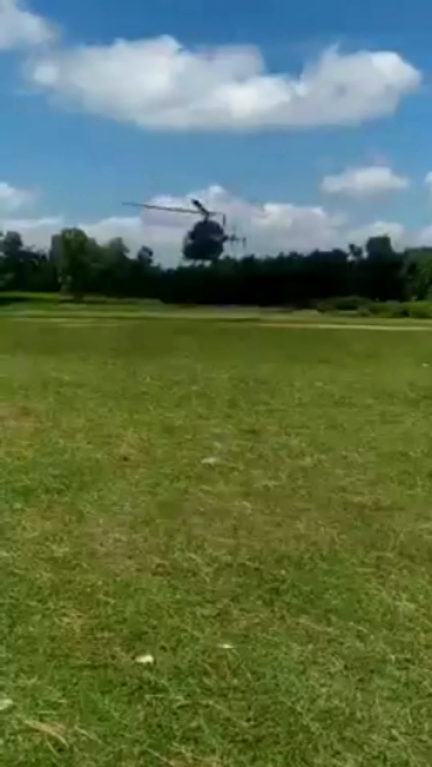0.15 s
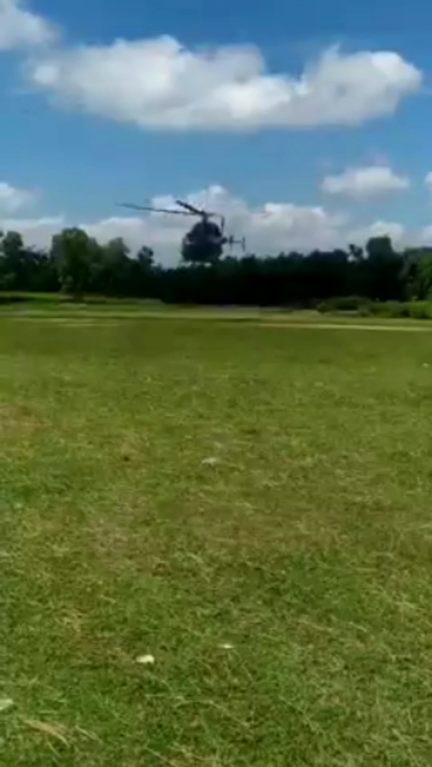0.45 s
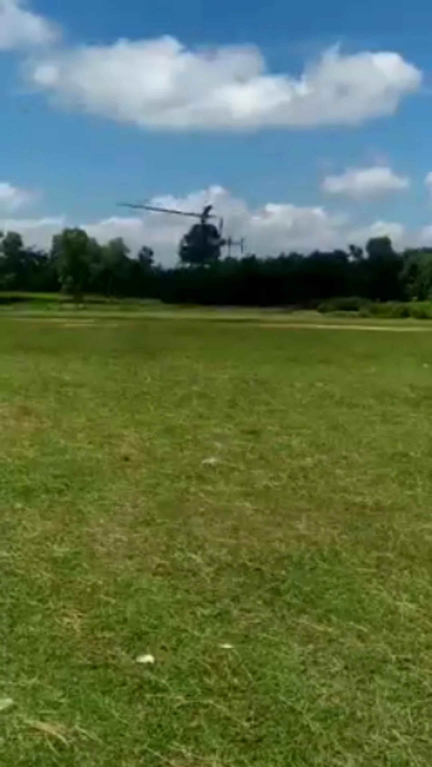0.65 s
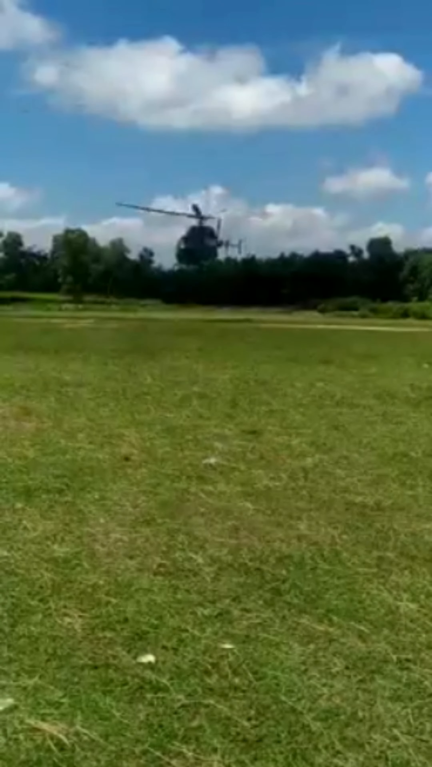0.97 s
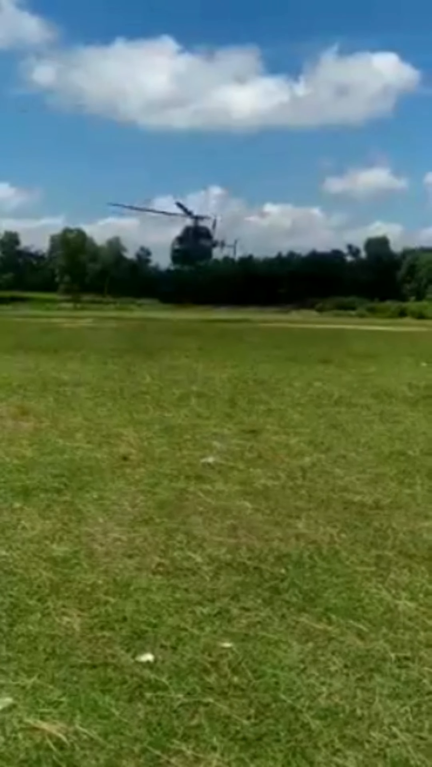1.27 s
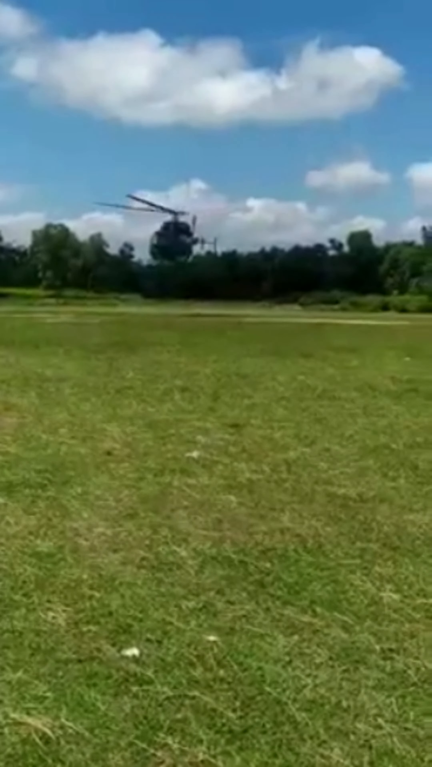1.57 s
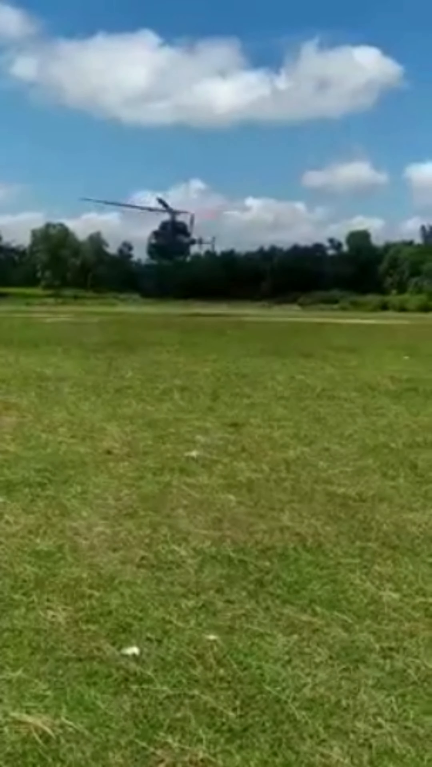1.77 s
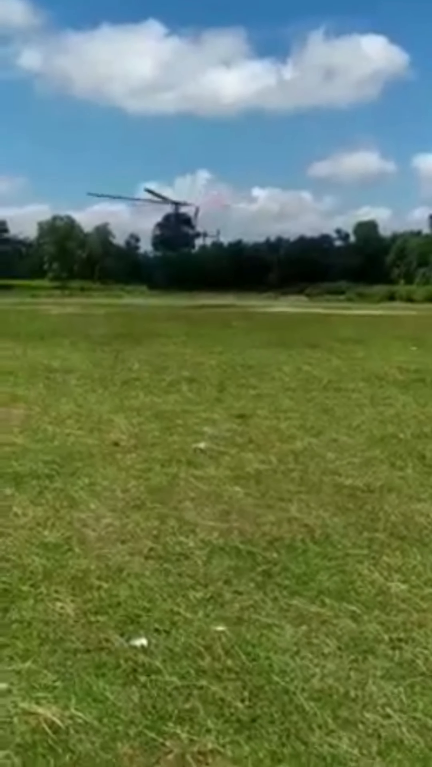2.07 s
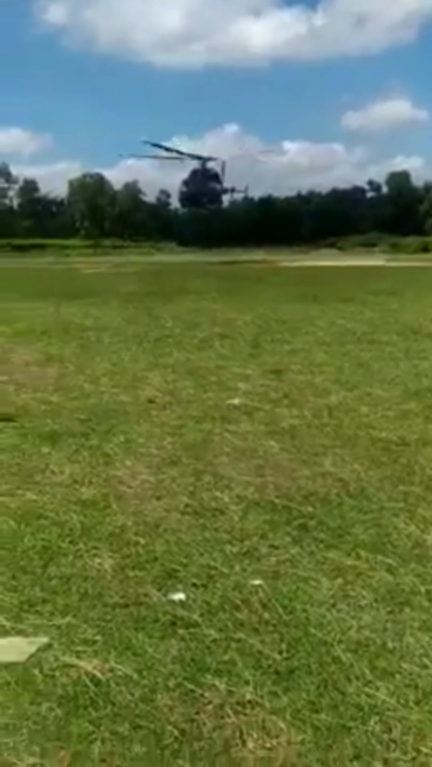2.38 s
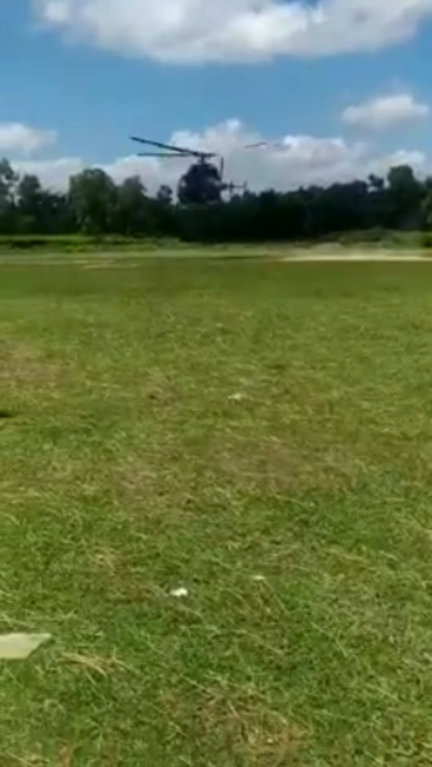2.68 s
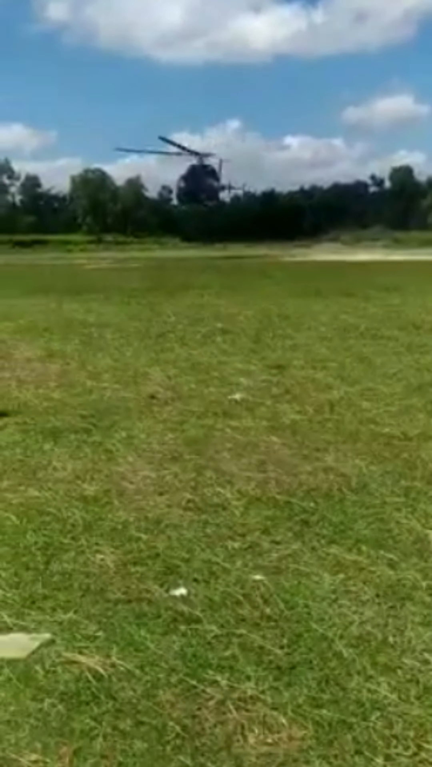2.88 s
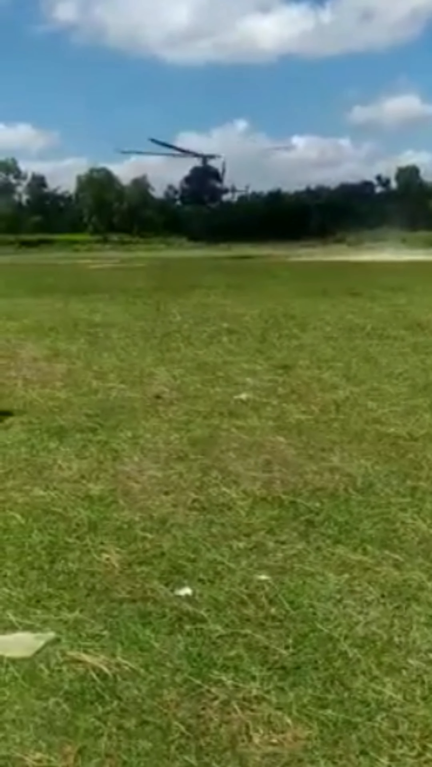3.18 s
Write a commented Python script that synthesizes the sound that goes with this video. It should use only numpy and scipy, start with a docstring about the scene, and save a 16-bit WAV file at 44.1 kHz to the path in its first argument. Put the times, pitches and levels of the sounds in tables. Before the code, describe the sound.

A helicopter hovers low nearby, its blades slapping fast over a steady rushing roar.

```python
"""A turbine helicopter hovers low over a grass field, some sixty metres from a phone.
It opens with a cluster of hard blade slaps (short noise bursts) over the steady roar of wash and exhaust
(banded noise, throbbing at each blade pass), two stacks of low rotor tones and thin high steady-pitched tones
that come and go. After the first second the slaps thin out, the tail rotor grows, the main thump loosens and
the roar loses its middle. Two microphone ports hear it slightly apart."""
import sys
import numpy as np
from scipy import signal
from scipy.fft import rfft, irfft
from scipy.io import wavfile
from scipy.ndimage import uniform_filter1d

SR = 44100
rng = np.random.default_rng(int(sys.argv[2]) if len(sys.argv) > 2 else 0)


def wrap_up_sound(samples):
    """Save the sound to the file named by the first command line argument, as 16-bit audio."""
    columns = np.atleast_2d(samples).T
    # keep every value between -1 and 1, then stretch to whole-number steps
    tamed = np.clip(columns, -1, 1)
    steps = np.round(tamed * 32767).astype(np.int16)
    wavfile.write(sys.argv[1], SR, steps)


N = 147294  # samples
TIME_S = np.arange(N) / SR
SIDE = np.array([[1], [-1]])  # left, right
BLADE_HZ, FIRST_BLADE_S = 26.66, 0.01054  # main blade passes per second, time of the first


def undb(db):
    """Decibels to an amplitude factor."""
    return 10 ** (np.asarray(db) / 20)


def curve(table, col):
    """A table column as a value for every sample."""
    rows = np.array(table)
    return np.interp(TIME_S, rows[:, 0], rows[:, col])


def shape(table, col, hz):
    """A table column read on a log-frequency axis."""
    rows = np.array(table)
    return np.interp(np.log(hz + 1), np.log(rows[:, 0]), rows[:, col])


def walk(rate_hz):
    """Random levels held 1 / rate s and slewed twice; spread near 1."""
    hold = int(SR / rate_hz)
    steps = np.repeat(rng.standard_normal(200)[:N // hold + 1], hold)
    slewed = uniform_filter1d(uniform_filter1d(steps, hold), hold)
    return 1.3 * slewed[:N]


def rms1(x):
    """Scale to an rms of 1."""
    return x / np.sqrt(np.mean(x ** 2))


def roar(hz, turns):
    """Wash and exhaust: noise bands that swell together, flicker alone and throb per blade; two unrelated copies."""
    # noise spectrum: pitch_hz, relative level_db
    roar_colour = [(40, -12), (100, 1), (200, 4), (320, 2), (450, -5), (750, 0), (1050, -5.5), (1600, -6),
                   (1850, -9), (2200, -5), (3100, -8), (3500, -11), (6000, -13), (10000, -17), (11800, -22),
                   (12500, -16), (14600, -15)]
    # slow balance: start_s, middle_db, treble_db, top_db
    balance = [(0, 0.8, -2, -1), (1.25, 0.5, -1.2, 2), (1.65, -0.8, -0.2, 2), (2.1, -2.5, 0.9, 3.5),
               (3, -4, -1.2, 2), (3.34, -6, 0.6, 1.5)]
    # corners of that balance: untouched below the first, then centres of middle, treble and top [Hz]
    balance_hz = (650, 1400, 6000, 13200)
    # throb at each blade and the puff after it, before depth per band: start_s, throb_db, puff_db, puff_lag_turns
    pulse = [(0.25, 5.5, 4.5, 0.3), (.55, 7.5, 2, .56), (1, 4.5, -2, 0.59), (1.3, 1, -3.5, .4),
             (1.7, 9, 6.5, 0.46), (2.1, 3, -1.5, 0.3), (2.5, 4.5, 0.5, .36), (2.68, 3.5, 7.5, 0.42),
             (2.9, 3.5, 3.5, 0.31)]
    roar_db, swell_db, flicker_db = -19.5, .2, 1.4
    swell_hz, flicker_hz = 1.94, 11
    pulse_scatter, pulse_sharpness = .2, 7  # spread of pulse size from blade to blade, narrowness

    def pulse_train(col, lag_turns):
        swing = np.cos(2 * np.pi * (turns - lag_turns)) - 1
        return curve(pulse, col) * np.exp(pulse_sharpness * swing)

    throb = pulse_train(1, 0)
    puff = pulse_train(2, curve(pulse, 3))
    blade = np.floor(turns + 1.5).astype(int)  # which blade is passing
    noise = rfft(rng.standard_normal((2, N))) * undb(shape(roar_colour, 1, hz))
    levels = np.array([curve(balance, c) for c in (1, 2, 3)])
    swell = walk(swell_hz)
    octave = np.log2(hz + 1)
    out = 0
    for centre in np.arange(5, 14.5, .5):  # half-octave steps, log2 of Hz
        band = np.cos(np.pi * np.clip(octave - centre, -.5, .5)) ** 2
        share = np.array([np.interp(centre, np.log2(balance_hz), row) for row in np.eye(4)[1:]])
        # the pulse is deepest around 700-2500 Hz
        depth = np.interp(centre, np.log2([200, 700, 2500, 5000, 12000]), [.3, 1.2, 1.05, .45, .35])
        size = 1 + pulse_scatter * rng.standard_normal(200)
        pulse_db = depth * (size[blade] * throb + size[blade + 1] * puff)
        drift_db = swell_db * swell + flicker_db * walk(flicker_hz)
        out = out + undb(share @ levels + drift_db + pulse_db) * irfft(noise * band, N)
    return rms1(out) * undb(roar_db)


def thin_high_tones():
    """High steady-pitched sines that waver in level, start and stop, set apart by level and phase between sides."""
    # tones: pitch_hz, start_s, end_s, level_db (rms, before waver and pan)
    high_tones = [(12937.5, 0, 1.19, -37), (12937.5, 1.47, 3.02, -36), (14062.5, .35, .63, -39),
                  (14062.5, 1.12, 1.5, -45), (14062.5, 2.95, 3.4, -39)]
    waver_db, waver_hz, edge_s = 1.2, 9, .02
    pan_db, lag_turns = -4, .2  # left minus right, left behind right
    out = 0
    for hz, start, end, db in high_tones:
        level = undb(db + waver_db * walk(waver_hz) + pan_db / 2 * SIDE)
        fade = np.clip(np.minimum(TIME_S - start, end - TIME_S) / edge_s, 0, 1)
        tone = np.sin(2 * np.pi * hz * TIME_S - np.pi * lag_turns * SIDE)
        out = out + np.sqrt(2) * level * fade * tone
    return out


def tail_rotor():
    """A few clean multiples of the tail blade rate that grow as the tail swings round."""
    # course: start_s, level_db (scaled for each tone), lag_turns
    tail_course = [(0, -4, -0.094), (.6, -5, -0.031), (1.7, -1.25, 0.02), (2.3, 0, 0.029),
                   (3.34, -0.1, -.08)]
    # tones: multiple, level_db (rms, before the course), share of the course level
    tail_tones = [(1, -24.5, 0.83), (2, -16.5, 0.83), (3, -20.5, 2.14)]
    tail_hz = 76.9
    start_turns, tone_turns, smear_turns = -.025, .38, .13  # phases; the smear grows with the multiple squared
    turns = start_turns + tail_hz * TIME_S - curve(tail_course, 2)
    out = 0
    for k, db, share in tail_tones:
        level = undb(db + share * curve(tail_course, 1))
        phase_turns = k * turns + tone_turns + smear_turns * k ** 2
        out = out + np.sqrt(2) * level * np.cos(2 * np.pi * phase_turns)
    return out


def main_rotor(turns):
    """Multiples of the blade rate; the lowest has no waver, the upper ones waver and gather into a thump."""
    # tones: multiple, level_db (rms, before the thump course)
    main_tones = [(2, -27), (3, -27.5), (4, -29), (5, -31), (6, -30), (7, -28.5), (8, -29), (9, -30.5),
                  (10, -34.5),]
    # the thump trails the slap and loosens as the machine turns:
    # start_s, lowest_db, lowest_lag_turns, upper_db, upper_lag_turns, upper_scatter_rad
    thump = [(0, 5.5, 0.12, -0.5, 0.067, 0.5), (.7, 0.5, 0.27, 1, 0.16, 0.26), (1.3, 6, 0.32, 0, 0.22, .4),
             (1.7, -5, 0.54, -1, 0.2, 0.77), (2.1, -4, 0.51, -2.5, 0.093, 1.5),
             (2.6, 2, 0.52, -4.5, 0.098, 2.6), (3.2, 4.5, 0.58, -3.5, .1, 2.1)]
    waver_db, waver_hz, skew_turns = 3, 6, -.36
    (k, db), upper = main_tones[0], main_tones[1:]
    lowest_turns = k * (turns - curve(thump, 2)) + skew_turns
    out = undb(db + curve(thump, 1)) * np.cos(2 * np.pi * lowest_turns)
    level_db, lag, scatter = (curve(thump, c) for c in (3, 4, 5))
    for k, db in upper:
        drift = scatter * walk(waver_hz) * (k > upper[0][0])  # the first upper tone keeps its phase
        level = undb(db + level_db + waver_db * walk(waver_hz))
        phase_turns = k * (turns - lag) + skew_turns
        out = out + level * np.cos(2 * np.pi * phase_turns + drift)
    return np.sqrt(2) * out


def slaps():
    """Loud blade slaps: noise bursts, quick up and slower down, each with its own tilt; two unrelated copies."""
    # hits: start_s, level_db (before the common gain), brightness_db (treble against bass)
    slap_hits = [(0.119, -4, -12), (0.271, -6, 11), (0.309, -2.5, 19), (0.345, -2.5, 14), (0.384, -3.5, 14),
                 (0.421, -6, 14), (0.534, -6.5, 6), (0.649, -6, -6), (0.685, -6, 16), (0.872, -3, 7),
                 (0.947, -5, -2), (1.546, -6.5, -15), (1.923, -7, 14), (2.561, -8.5, 14),
                 (2.597, -7.5, -11), (2.761, -10.5, 7.5)]
    # common colour: pitch_hz, relative level_db
    slap_colour = [(250, -8), (500, 1.5), (800, 18), (1300, 4.5), (2300, 1), (4500, -15.5), (14000, -25)]
    rise_s, fall_s, lead_s = 0.0031, 0.004, .005  # lead: silence ahead of the rise
    gain_db, tilt_hz = -8, 1500
    size = 2048  # samples per burst
    age = np.arange(size) / SR - lead_s
    hz = np.fft.rfftfreq(size, 1 / SR)
    rise = np.sin(np.pi / 2 * np.clip(age / rise_s, 0, 1)) ** 2
    env = rise * np.exp(-np.maximum(age - rise_s, 0) / fall_s)
    tilt = hz ** 2 / (hz ** 2 + tilt_hz ** 2) - .5
    out = np.zeros((2, N + size))
    for start, db, bright_db in slap_hits:
        colour_db = shape(slap_colour, 1, hz) + bright_db * tilt
        burst = irfft(rfft(env * rng.standard_normal((2, size))) * undb(colour_db), size)
        # colour must not change the energy
        even = np.sqrt(np.sum(env ** 2) / np.sum(burst ** 2, axis=1, keepdims=True))
        at = int((start - lead_s) * SR)
        out[:, at:at + size] += burst * undb(db + gain_db) * even
    return out[:, :N]


def microphone_ports(hz, tones, shared, apart):
    """Two ports: level and phase differ with pitch, and unlike noise is mixed in where they agree less."""
    # ports: pitch_hz, left_minus_right_db, left_lag_turns, likeness (0-1)
    ports = [(100, 0, 0, .999), (230, 1.1, .015, .98), (350, 2.8, .09, .9), (450, -.5, .05, .6),
             (600, -.8, 0, .93), (780, .2, 0, .99), (870, 4.8, .05, .65), (1000, .1, .3, .55),
             (1170, -6, .15, .45), (1380, .3, 0, .75), (1600, 2.4, .11, .65), (1980, .8, .02, .82),
             (2350, 4.2, .15, .35), (2900, 2.8, .35, .4), (3550, .3, .5, .95), (4300, .1, .65, .25),
             (7100, -.6, 1, .3), (11000, -.3, 1.5, .6), (12000, -1.5, 1.7, .15), (14500, -3, 2, .3)]
    angle = np.arccos(np.clip(shape(ports, 3, hz), 0, 1)) / 2
    level = undb(SIDE * shape(ports, 1, hz) / 2)
    lag = np.exp(-1j * np.pi * SIDE * shape(ports, 2, hz))
    noise = np.cos(angle) * shared + SIDE * np.sin(angle) * apart
    return irfft(level * lag * (tones + noise), N)


def scene():
    """Roar, slaps and rotor tones through the two ports, with the thin high tones added on top."""
    hz = np.fft.rfftfreq(N, 1 / SR)
    turns = BLADE_HZ * (TIME_S - FIRST_BLADE_S)  # one turn is one blade pass
    shared, apart = rfft(roar(hz, turns) + slaps())
    tones = rfft(main_rotor(turns) + tail_rotor())
    return microphone_ports(hz, tones, shared, apart) + thin_high_tones()


def record(dry):
    """The phone cuts the deepest bass, rounds the peaks and cuts the top."""
    low_cut_hz, top_hz, drive = 41, 14650, .95
    high_pass = signal.butter(4, low_cut_hz, "high", fs=SR, output="sos")
    low_pass = signal.ellip(12, .2, 70, top_hz, fs=SR, output="sos")  # ripple and stopband in dB
    rounded = np.tanh(drive * signal.sosfilt(high_pass, dry)) / drive
    return signal.sosfilt(low_pass, rounded)


dry = scene()
out = record(dry)
wrap_up_sound(out)
```